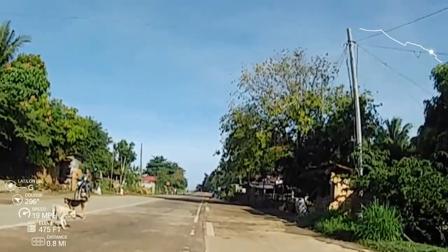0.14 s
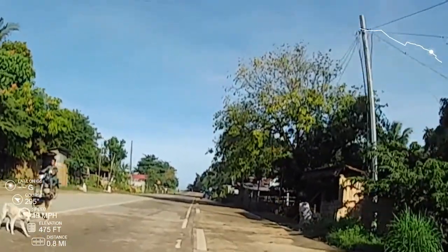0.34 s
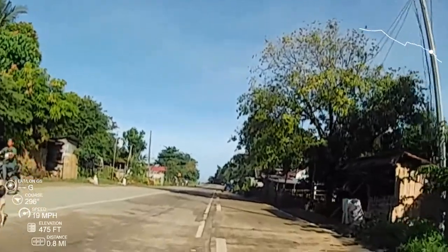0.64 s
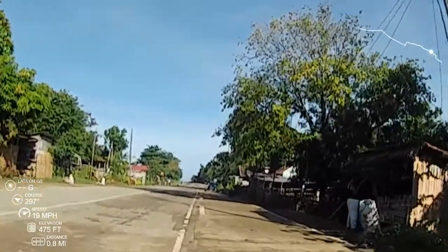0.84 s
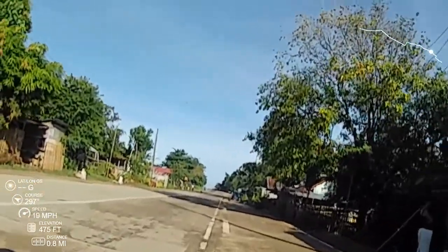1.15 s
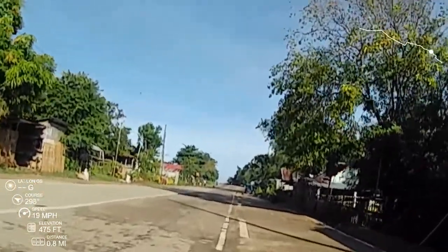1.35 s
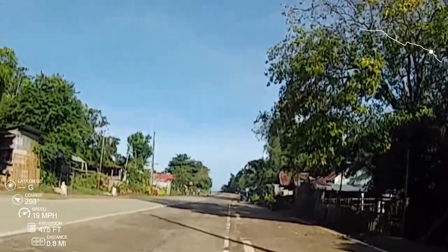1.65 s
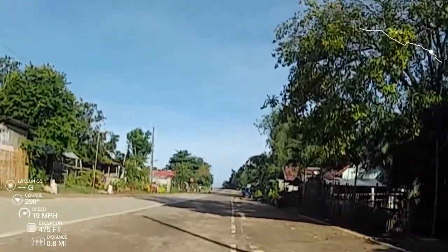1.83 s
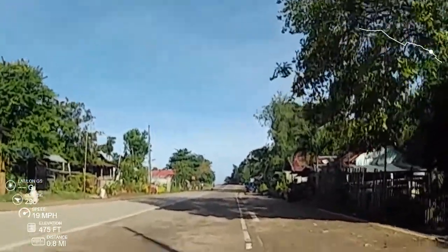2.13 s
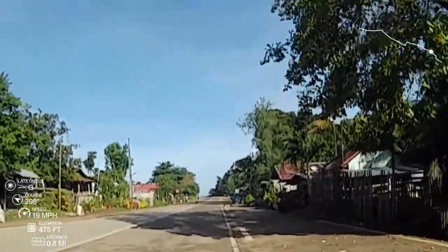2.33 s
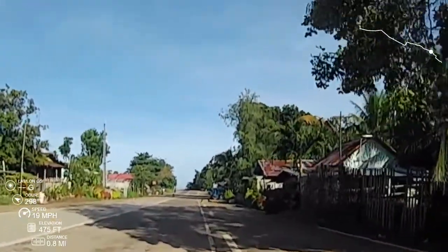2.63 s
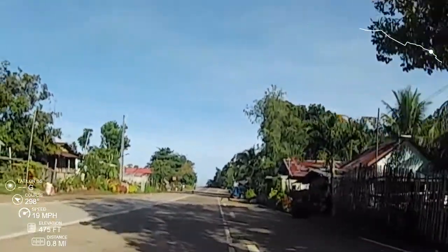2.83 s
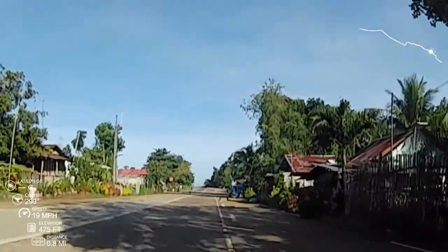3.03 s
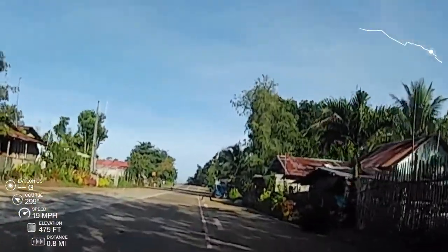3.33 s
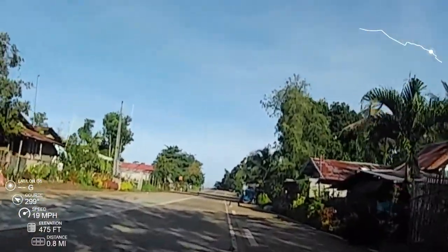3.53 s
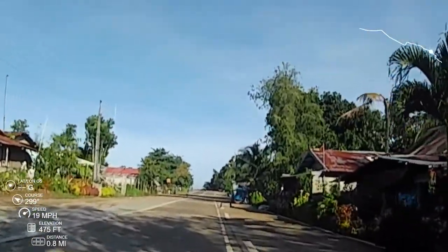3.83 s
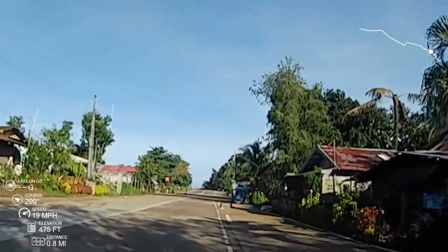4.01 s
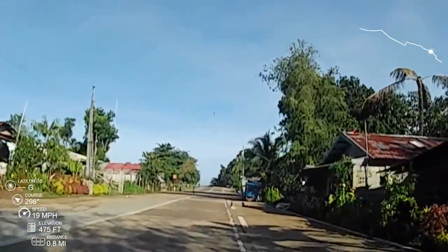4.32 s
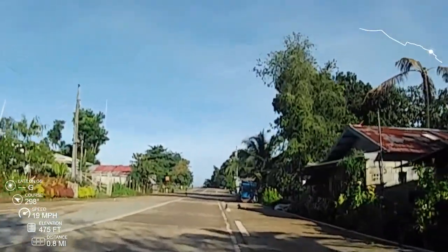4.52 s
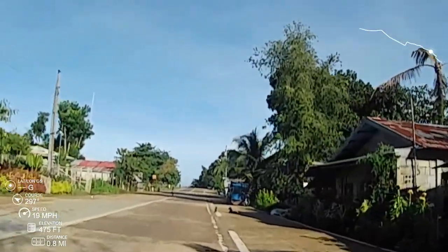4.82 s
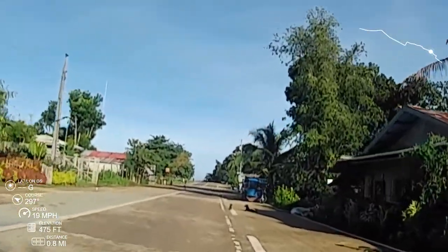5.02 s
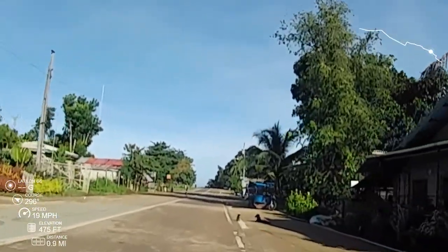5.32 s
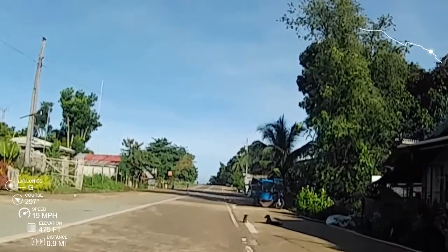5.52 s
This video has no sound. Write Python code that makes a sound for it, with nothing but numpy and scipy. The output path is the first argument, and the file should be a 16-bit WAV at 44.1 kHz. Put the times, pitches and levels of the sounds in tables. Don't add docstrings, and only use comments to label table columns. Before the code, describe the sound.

A loud bicycle bell stroke overloads the microphone early on, then rings out shimmering over buffeting wind, wavering whistles and tyre hiss on a paved road.

```python
import sys
import numpy as np
from scipy import signal
from scipy.io import wavfile
from scipy.ndimage import uniform_filter1d, minimum_filter1d

SR = 44100
rng = np.random.default_rng(int(sys.argv[2]) if len(sys.argv) > 2 else 0)


def transcribe(u):
    v = np.clip(np.atleast_2d(u).T, -1, 1)
    q = np.round(v * 32767).astype(np.int16)
    wavfile.write(sys.argv[1], SR, q)


def linear_from_db(decibels):
    return 10 ** (np.asarray(decibels, float) / 20)


N = 249606
T = np.arange(N) / SR
STROKE_S, RECOVER_S = .7530, .8743


def rms_one(x):
    return x / np.sqrt(np.mean(x ** 2) + 1e-20)


def drift(rate):
    r = np.exp(-16 * np.pi * rate / SR)
    slow = signal.lfilter([1], [1, -2 * r, r * r], rng.standard_normal(N // 8 + 4002))[4000:]
    return np.interp(np.arange(N) / 8, np.arange(len(slow)), rms_one(slow))


def swells(rows):
    s, length, *levels_db = np.transpose(rows)
    coarse = T[::32]
    shape = np.clip(2.8 * (1 - 2 * np.abs(coarse - s[:, None]) / length[:, None]), 0, 1)
    return [np.interp(T, coarse, level_db @ shape) for level_db in levels_db]


def banded_noise(spectrum, shared_db, own_db, count=3):
    hz, level_db = np.transpose(spectrum)
    edges = hz[0] * 2 ** np.arange(0, np.log2(hz[-1] / hz[0]), 1 / count)
    together = drift(4.6) + drift(63.0)
    white = rng.standard_normal((2, N))
    out = 0
    for k, (low, high) in enumerate(zip(edges, edges[1:])):
        sos = signal.butter(2, [low, min(high, .45 * SR)], "band", fs=SR, output="sos")
        band = signal.sosfilt(sos, white[k % 2])
        centre_db = np.interp(np.log(low * high) / 2, np.log(hz), level_db)
        out = out + band * linear_from_db(centre_db + shared_db * together + own_db * drift(14.0))
    return rms_one(out)


def gain_control():
    earlier_duck_db, duck_db, overshoot_db = -3, -9, 2.5
    sink_s, hold_s, climb_db_per_s = 0.05, 0.57, 3.5
    age = np.maximum(T - RECOVER_S, 0)
    after = duck_db + overshoot_db * np.exp(-age / sink_s) + climb_db_per_s * np.maximum(age - hold_s, 0)
    return np.where(T < STROKE_S, earlier_duck_db, np.minimum(after, 0))


# t/s, edge tone f/Hz, flow level/dB
AIR = [(.116, 938, -0.5), (.44, 1285, 1.5), (.745, 950, 2), (1.31, 1324, 0.5), (1.45, 1125, 1),
       (1.96, 1240, 2.5), (2.15, 1070, 1.5), (2.53, 1080, 1), (2.56, 1231, 2.5), (2.91, 1118, 1.5),
       (3.42, 1330, 0.5), (3.77, 1021, 0.5), (4.01, 1240, 1.5), (4.46, 1047, 0.5), (4.67, 1352, 0.5),
       (4.9, 1294, 1.5), (5.07, 1040, 0), (5.41, 1278, 1.5)]


def air():
    s, hz, flow_db = np.transpose(AIR)
    return np.interp(T, s, hz), np.interp(T, s, flow_db)


# centre t/s, length t/s, level/dB
GUSTS = [(.24, 0.034, 3.5), (.4, 0.18, 5), (.57, 0.18, 3), (.92, .1, 2.5), (1.04, 0.12, 5),
         (1.42, 0.14, 4.5), (1.9, 0.07, 3.5), (2.04, 0.049, 5), (2.33, 0.067, 5.5), (2.6, 0.23, 1.5),
         (3.33, 0.39, 6), (3.89, 0.24, 2.5), (4.11, 0.081, 2.5), (4.33, 0.084, -4), (4.55, 0.088, 4),
         (4.93, .2, 2.5), (5.2, 0.13, 1.5)]


def follows(mean_db, flow, duck, gust):
    return mean_db + flow * air()[1] + duck * gain_control() + gust * swells(GUSTS)[0]


# centre t/s, length t/s, edge tone level/dB, hiss level/dB
EDDIES = [(.1, 0.037, -30, 3), (.21, 0.074, 5, 7), (.3, 0.08, -27, -9), (.41, .08, -9, -5),
          (.5, 0.051, 4.5, 6.5), (.63, 0.053, -3, -10), (.66, 0.023, 2.5, 4), (1.09, 0.58, -28, -2.5),
          (2.44, 0.064, -1, 4.5), (2.57, .08, 5.5, 3), (2.775, 0.074, 4.5, -10), (2.81, 0.025, -19, -10),
          (2.855, 0.035, -21.5, -4.5), (3.13, 0.075, 5, 2), (3.21, 0.078, -35, -22), (3.32, 0.052, 0, -8.5),
          (3.45, 0.077, 5, 4.5), (3.56, .03, -3, -7.5), (3.79, 0.065, 4, 5), (4.0, 0.022, 1, 6),
          (4.28, 0.014, -20.5, -2), (4.46, 0.057, 4.5, 0), (4.53, 0.087, -0.5, 5), (4.68, 0.051, 3.5, 4),
          (4.73, 0.016, -11, -5), (4.82, 0.068, 6, 1.5), (4.865, .02, -2, -13.5), (4.955, 0.037, -26, -15),
          (5.05, .03, -24.5, -12), (5.2, .1, 1, 3)]


def eddies():
    return swells(EDDIES)


# f/Hz, level/dB per Hz
BUFFET = [(12, -13.5), (25, 3.5), (40, 0.5), (60, -2.5), (120, -5.5), (200, -10.5), (300, -15.5),
          (600, -37)]


def buffet():
    return linear_from_db(follows(-20.5, 0.36, 0.53, 0.88) - 1.0) * banded_noise(BUFFET, shared_db=0.18, own_db=0.0)


# f/Hz, level/dB per Hz
RUSH = [(120, -17), (250, -1), (440, -4), (600, -2), (770, -8), (1100, -4.5), (1600, -10.5), (2200, -25),
        (4000, -31.5)]


def rush():
    return linear_from_db(follows(-26.5, 1.57, 1.18, 0.03) + 0.97) * banded_noise(RUSH, shared_db=1.58, own_db=2.62)


# f/Hz, level/dB per Hz
TYRE = [(900, -16.5), (1700, 9), (2600, 8), (3400, -2), (4000, 4.5), (4800, -4.5), (5600, -7.5),
        (6600, -10)]


def tyre_hiss(hiss_db):
    return linear_from_db(hiss_db + 6.5) * banded_noise(TYRE, shared_db=2.5, own_db=2.0, count=4)


# f/Hz, level/dB per Hz
FAINT = [(5000, -5), (6500, -5), (8000, -12), (9300, -10), (10000, -30), (10900, -14.5), (11600, -24),
         (12500, -36), (15600, -46.5)]


def far_hiss(hiss_db):
    level_db = -62.5 + 0.72 * (uniform_filter1d(hiss_db, size=8000) + 44.5)
    faint = linear_from_db(level_db) * banded_noise(FAINT, shared_db=-1.0, own_db=3.0, count=7)
    gap_hz = (9550, 10300)
    return signal.sosfilt(signal.butter(4, gap_hz, "bandstop", fs=SR, output="sos"), faint)


def cavity():
    hoot_hz, width_hz, patchy_db = 590, 70, 4.0
    b, a = signal.iirpeak(hoot_hz, hoot_hz / width_hz, fs=SR)
    once = signal.lfilter(b, a, rng.standard_normal(N))
    hoot = rms_one(signal.lfilter(b, a, once))
    return hoot * linear_from_db(follows(-40.5, 5.4, 2.9, 1.7) + patchy_db * drift(3.6))


BELL_HZ = [3195.92, 3241.0, 4526.2, 6391.6, 7141.0, 7173.7, 8426.25, 11040.6, 12326.25, 14941.0, 7095.8,
           14973.7, 14895.8]
# old hum level/dB rms, stroke level/dB rms, t60/s, level/dB gained while the microphone is swamped
BELL = [(-25.5, -18, 6.23, 4), (-18, -14.5, 6.57, -3), (-61, -39.5, 2.6, 26.5), (-98.5, -60.5, 4.7, 5),
        (-63, -58, 3.8, 16), (-75.5, -65.5, 6.0, 43.5), (-30.5, -12, 2.52, 15), (-84, -94, 40, 67),
        (-66, -45.5, 2.55, 22), (-83.5, -79.5, 5.0, 26), (-65.5, -60.5, 4.0, 17), (-87, -81.5, 5.0, 20),
        (-86, -83, 5.0, 22.5)]
BEAT_TOPS_S = (.0112, .9018)


def bell():
    struck = T >= STROKE_S
    age = np.where(struck, T - STROKE_S, T)
    in_step = T - np.where(struck, BEAT_TOPS_S[1], BEAT_TOPS_S[0])
    rows = []
    for hz, (old_db, new_db, t60, _) in zip(BELL_HZ, BELL):
        level_db = np.where(struck, new_db, old_db) - 60 * age / t60
        rows.append(linear_from_db(level_db) * np.sin(2 * np.pi * hz * in_step))
    trim_db = np.where(struck, 7.5, -1.5)
    return np.sqrt(2) * linear_from_db(gain_control() + trim_db) * np.array(rows)


# t/s, peak level/dB, f/Hz
LOCKS = [(.005, -23.5, 1024), (.06, -21, 1210), (.115, -24, 903), (.347, -22.5, 1360), (.735, -22, 1170),
         (0.876, -25.5, 1230), (1.014, -29.5, 1325), (1.297, -24.5, 1314), (1.373, -27, 1330),
         (3.333, -21, 1060), (3.984, -22, 1338), (4.213, -19, 1170), (4.292, -18, 1046),
         (4.662, -20.5, 1410), (5.01, -19.5, 1265), (5.068, -16.5, 1041), (5.243, -14.5, 1018),
         (5.273, -16, 1100), (5.486, -16, 1245)]


def locks():
    rise_s, t60_s = 0.0013, 0.068
    out, age = np.zeros(N + SR), T[:SR // 4]
    for s, peak_db, hz in LOCKS:
        shape = (1 - np.exp(-age / rise_s)) * linear_from_db(peak_db + 6.5 - 60 * age / t60_s)
        out[round(s * SR):][:len(age)] += shape * np.sin(2 * np.pi * hz * age)
    return out[:N]


def whistle():
    edge_db = eddies()[0]
    hush_s, hush_db = 0.04, -16
    hush = swells([(s - hush_s / 2, hush_s, hush_db) for s, _, _ in LOCKS])[0]
    level_db = follows(-22.5, 2.15, 1.15, 0.29) + edge_db + hush
    lift_hz = 5.0 * np.maximum(edge_db, 0)
    wobble_hz = 30 * drift(14.0) + 95 * drift(120.0)
    phase = 2 * np.pi * np.cumsum(air()[0] + lift_hz + wobble_hz) / SR
    burst = np.clip(1.0 + .06 * drift(6.7) + 0.34 * drift(30.0) + 0.49 * drift(91.0), 0, None)
    burst = rms_one(burst) * linear_from_db(level_db - 1.0)
    strength = np.tanh(burst / linear_from_db(-22.5))
    overtones = linear_from_db(-17.5) * np.sin(2 * phase) + linear_from_db(-22) * strength * np.sin(3 * phase)
    return burst * (np.sin(phase) + strength * overtones)


# t/s, peak level/dB, f/Hz, width f/Hz, t60/s
TICKS = [(0.214, -62, 9770, 200, 0.018), (0.7526, -2, 3320, 3040, 0.0084), (.886, -27, 9600, 3990, .06),
         (2.155, -57, 9250, 300, 0.048), (2.435, -45, 6160, 500, .03), (2.525, -36, 3020, 3000, .005),
         (2.588, -22, 2320, 1780, 0.0051), (3.44, -27.5, 4000, 1500, 0.022), (3.83, -16, 2270, 1500, 0.013),
         (4.422, -48, 8700, 1200, 0.053), (4.4388, -36, 8560, 1100, 0.013), (4.449, -46, 8600, 1000, 0.04),
         (4.43, -58, 15000, 900, 0.076), (4.437, -53.5, 12010, 3000, 0.018),
         (4.85, -49.5, 7440, 1200, 0.056), (4.8678, -39, 7400, 1100, 0.025), (4.868, -49, 8800, 900, 0.097),
         (4.885, -48, 7400, 1500, 0.034)]


def ticks():
    out, draws = np.zeros(N), rng.standard_normal((len(TICKS), 2500))
    for (s, peak_db, hz, width_hz, t60), draw in zip(TICKS, draws):
        edges = [max(hz - width_hz / 2, 50), hz + width_hz / 2]
        band = signal.butter(3, edges, "band", fs=SR, output="sos")
        tick = signal.sosfilt(band, draw * linear_from_db(-60 * T[:2500] / t60))
        out[round(s * SR):][:2500] += linear_from_db(peak_db + 2.5) * tick / np.max(np.abs(tick))
    return out


# f/Hz, level/dB per Hz
CRACKLE = [(200, -23.5), (1800, -12), (3500, -16), (6000, -6), (8400, 1.5), (10500, 3), (13000, -19.5),
           (15700, -19), (17000, -30)]


def overload(wind, modes):
    span = slice(round((STROKE_S - .02) * SR), round((RECOVER_S + .02) * SR))
    swollen = modes * linear_from_db(np.array(BELL)[:, 3:])
    beat = (1 + np.cos(2 * np.pi * (BELL_HZ[1] - BELL_HZ[0]) * (T - BEAT_TOPS_S[1]))) / 2
    break_s, rise_db_per_s, fall_db_per_s = .79, 297, 202.5
    slope = np.where(T < break_s, rise_db_per_s, fall_db_per_s)
    through_db = np.maximum(5.5 - np.abs(T - break_s) * slope, -6.5)
    breaking = linear_from_db(through_db) * (0.17 + beat ** 1.4)
    swollen[:2] *= breaking
    swollen[2] *= breaking ** 0.28
    crack = linear_from_db(-13 - 60 * np.abs(T - STROKE_S) / 0.0053) + linear_from_db(-9 - 60 * np.abs(T - RECOVER_S) / 0.0065)
    crackle = banded_noise(CRACKLE, shared_db=.2, own_db=1.2)
    noise = crackle * (linear_from_db(-12) * (1 + .15 * breaking) + crack)
    swing = signal.hilbert((linear_from_db(4) * wind + swollen.sum(axis=0) + noise)[span])
    pulled = 0.37 * beat ** 2.5
    limited = np.zeros(N)
    limited[span] = linear_from_db(-1.0) * (swing / np.abs(swing) * np.exp(1j * pulled[span])).real
    limited = signal.sosfilt(signal.butter(2, 11000, fs=SR, output="sos"), limited) + linear_from_db(-6.0) * noise
    swamped = uniform_filter1d(1.0 * (T >= STROKE_S) * (T < RECOVER_S), size=20)
    return swamped * limited + (1 - swamped) * (wind + modes.sum(axis=0))


def scene():
    hiss_db = follows(-44.5, 2.7, 1.14, 0.05) + eddies()[1]
    wind = buffet() + rush() + tyre_hiss(hiss_db) + whistle() + cavity()
    wind = signal.sosfilt(signal.cheby2(14, 45, 6050, fs=SR, output="sos"), wind)
    return overload(wind + far_hiss(hiss_db) + ticks() + locks(), bell())[None]


# f/Hz, level/dB
STEP = [(300, -61.5), (1200, -42), (2200, -49.5), (3000, -52), (5000, -50), (7000, -55), (10000, -59.5),
        (15000, -65)]
# f/Hz, level/dB
THIN = [(0, -20), (3500, -6), (5300, 5), (5900, 11.5), (16000, 12.5)]


def round_lines(x):
    hz, _, lines = signal.stft(x, SR, "cosine", 2048, 1024)
    treble = np.sqrt(2 * np.sum(np.abs(lines[:, hz > 2000]) ** 2, axis=1, keepdims=True))
    step = linear_from_db(np.interp(hz, *np.transpose(STEP)))[:, None] * (treble / linear_from_db(-28.5)) ** 0.73 * linear_from_db(-22.0)
    local = np.exp(uniform_filter1d(np.log(np.abs(lines) + 1e-9), size=24, axis=1))
    least = linear_from_db(np.interp(hz, *np.transpose(THIN)))[:, None] * minimum_filter1d(local, size=5)
    least = least * (treble < linear_from_db(-14))
    band_luck = rng.standard_normal((65, lines.shape[2]))
    band_luck = np.repeat(band_luck, 16, axis=0)[:len(hz)]
    step = np.clip(step, least, linear_from_db(11) * local) * linear_from_db(1.5 * band_luck)
    size = np.abs(lines) / step
    rounded = lines * np.floor(size + .4) / (size + 1e-9)
    return signal.istft(rounded, SR, "cosine", 2048, 1024)[1][:, :N]


def roll_off(x):
    return signal.sosfilt(signal.butter(12, 16480, fs=SR, output="sos"), x)


def record(dry):
    soft = dry / (1 + np.abs(dry / .9) ** 8) ** (1 / 8)
    cut = signal.sosfilt(signal.cheby2(14, 60, 16300, fs=SR, output="sos"), round_lines(soft))
    return roll_off(cut)


dry = scene()
out = record(dry)
transcribe(out)
```